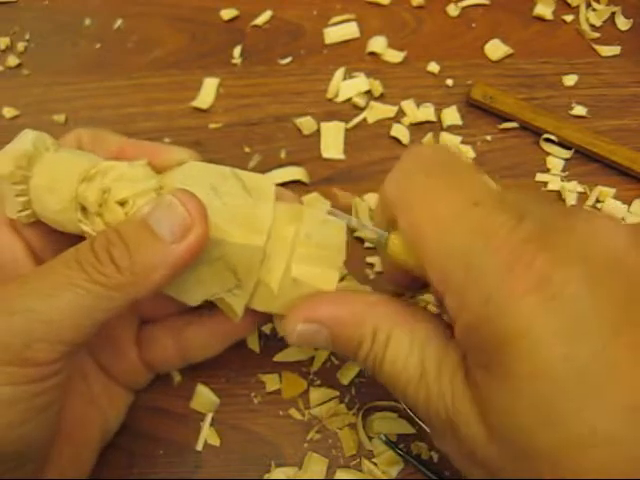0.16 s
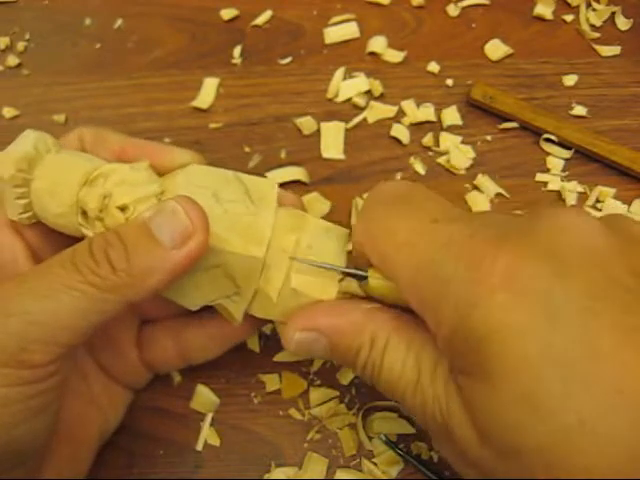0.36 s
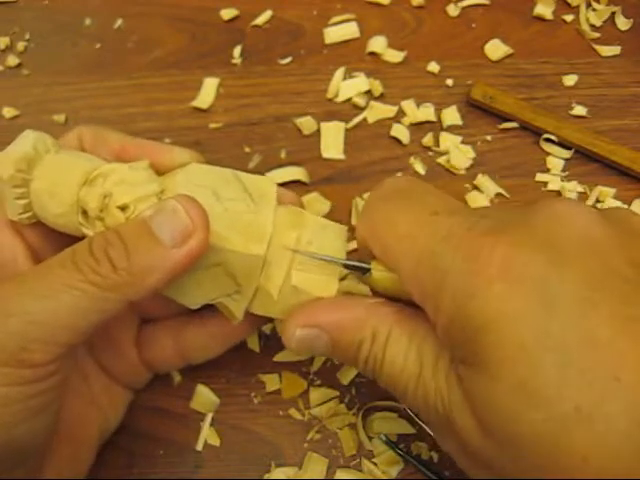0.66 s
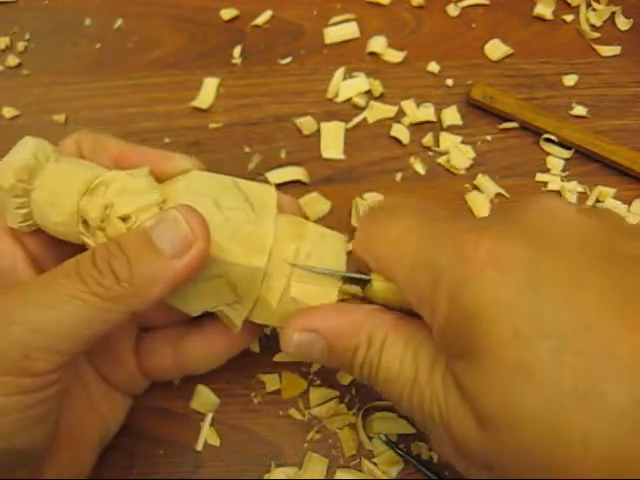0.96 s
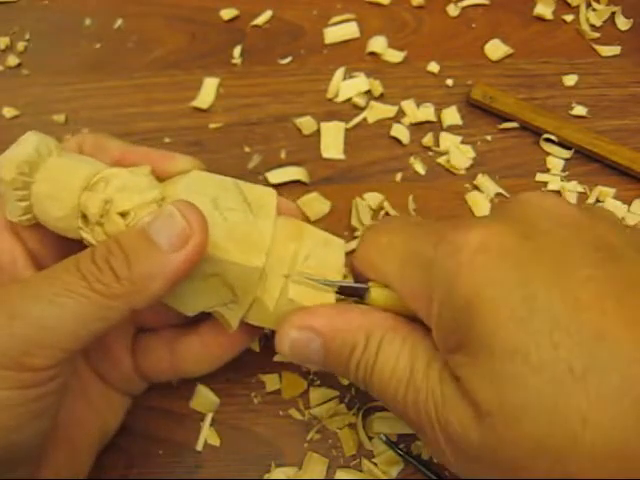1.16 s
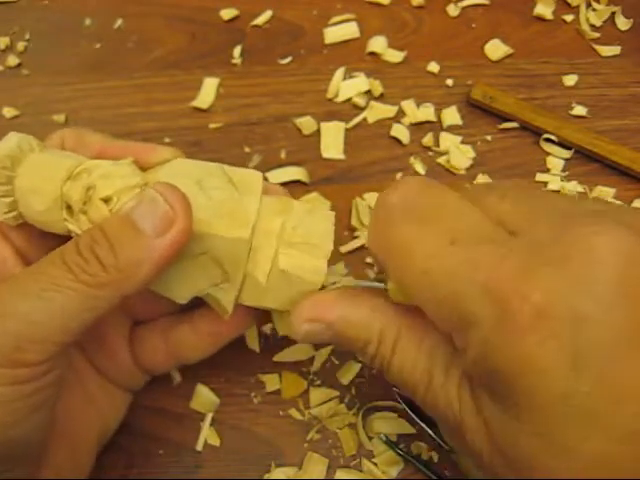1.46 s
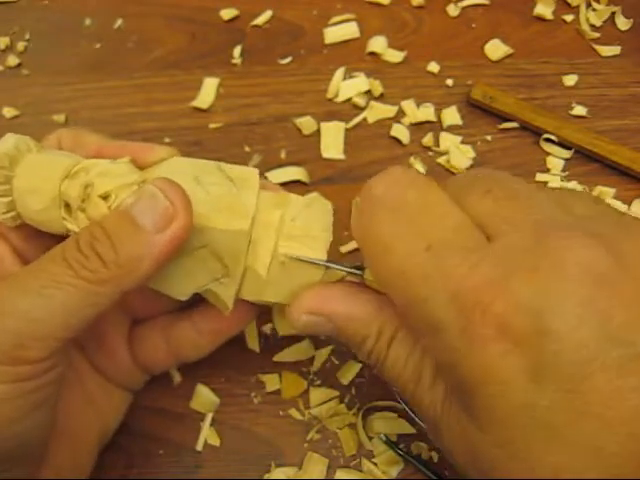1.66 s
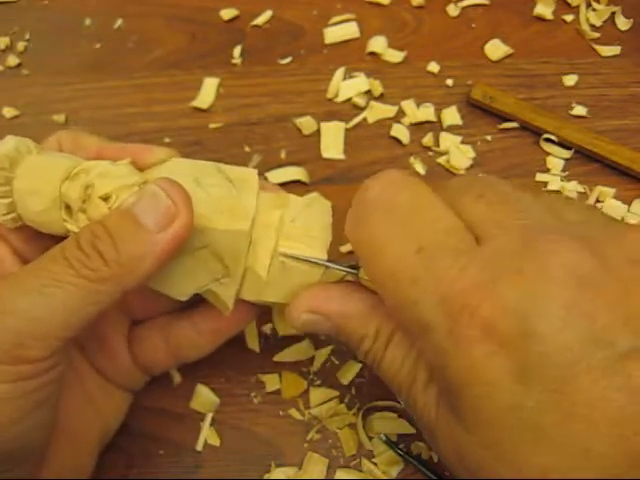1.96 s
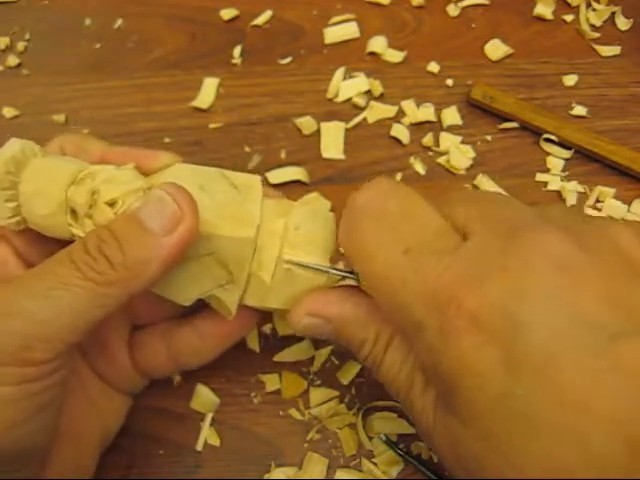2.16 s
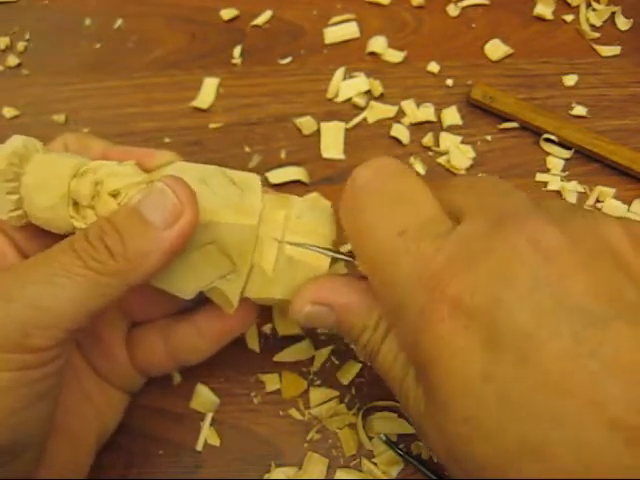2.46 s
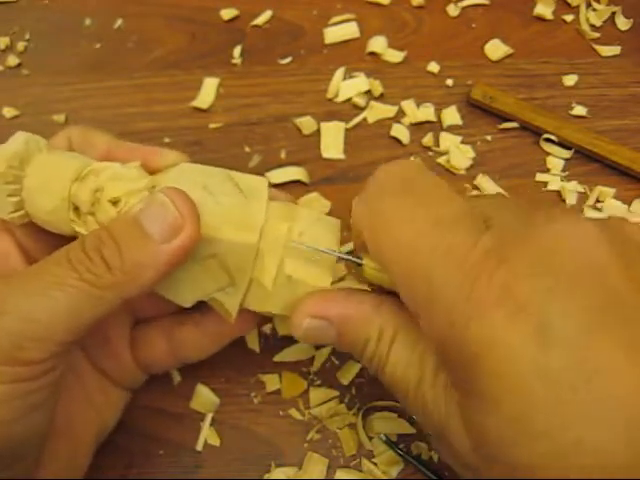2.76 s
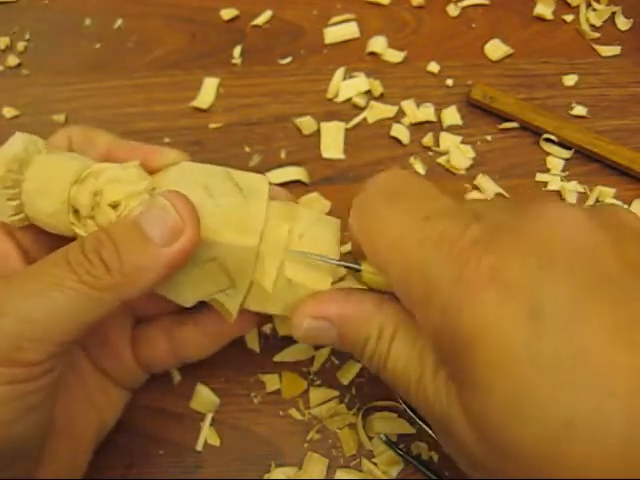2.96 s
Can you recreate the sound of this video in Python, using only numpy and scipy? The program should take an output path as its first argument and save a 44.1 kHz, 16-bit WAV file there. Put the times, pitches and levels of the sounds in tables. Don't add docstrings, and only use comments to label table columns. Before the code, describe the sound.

A small knife carves soft wood: faint cracks first, a loud snap with a table knock, a sharp click, then stuttering low creaks with squeaks and ticks; quiet humming room, close low-quality microphone.

```python
import sys
import numpy as np
from scipy import signal
from scipy.io import wavfile
from scipy.ndimage import uniform_filter1d

SR = 44100
rng = np.random.default_rng(int(sys.argv[2]) if len(sys.argv) > 2 else 0)


def gain_from_decibels(decibels):
    exponent = np.asarray(decibels, float) / 20
    return 10 ** exponent


def log_audio(samples):
    frames = np.atleast_2d(samples).T
    limited = np.clip(frames, -1, 1)
    pcm = np.round(limited * 32767).astype(np.int16)
    wavfile.write(sys.argv[1], SR, pcm)


N = 136710

# f/Hz, level/dB rms
HUM_LINES = [(58.8, -45), (119.5, -51), (352.5, -53), (411, -52)]
# f/Hz, width/Hz, level/dB rms
AIR_BANDS = [(110.24, 60, -53), (201.5, 64, -48), (289, 50, -47.5), (350.2, 45, -44.5), (410.8, 50, -49.5),
             (545.3, 200, -49), (820, 120, -50.5), (991.7, 180, -49.5), (1434, 500, -54.5),
             (2497, 3000, -56), (34.94, 30, -59)]
# f/Hz, level/dB, t60/s
TABLE_MODES = [(159.7, -14, 0.44), (264.5, -9.5, .2), (327.5, -3.5, 0.36), (333, -10.5, .2),
               (421, -6, 0.18), (515, -25, 0.038), (748, -7.5, 0.15), (887, -6, 0.032), (973, -5, .08),
               (1110, -18.5, 0.059)]
# t/s, level/dB
CREAK_SLIPS = [(1.865, -31), (1.893, -39), (1.922, -36.5), (1.975, -26), (1.996, -24), (2.018, -18.5),
               (2.043, -19.5), (2.069, -19.5), (2.095, -19.5), (2.121, -21), (2.145, -22.5), (2.172, -26),
               (2.201, -19.5), (2.227, -23), (2.254, -22), (2.283, -27.5), (2.313, -27.5), (2.345, -25),
               (2.379, -26), (2.413, -25.5), (2.45, -24), (2.485, -25.5), (2.523, -22), (2.563, -27),
               (2.597, -28.5), (2.719, -25.5)]
# t/s, level/dB, f/Hz
BLADE_SQUEAKS = [
    (1.975, -29, 1080),
    (1.988, -34, 1020),
    (1.9965, -31, 1830),
    (2.021, -34, 1800),
    (2.045, -30, 1970),
    (2.071, -39, 1950),
    (2.095, -39, 1940),
    (2.174, -39, 1850),
    (2.256, -42, 1900),
]
# t/s, rise/s, hold/s, fall/s, level/dB, f/Hz, width/Hz
EDGE_SCRAPES = [
    (.877, .001, .025, .02, -29, 2600, 5000),
    (.905, .022, .006, .004, -30, 4000, 4500),
    (.944, .002, .004, .035, -34, 3300, 5000),
    (.877, .001, .015, .02, -29, 600, 500),
    (1.194, .002, .01, .04, -34, 2900, 2500),
    (-.01, .005, .025, .025, -37, 3900, 3000),
    (2.085, .03, .09, .02, -41, 2600, 5000),
    (2.108, .032, .01, .007, -32, 3950, 1300),
    (2.164, .008, .008, .012, -39, 3700, 3000),
    (2.215, .015, .008, .008, -44, 3900, 3000),
]
# t/s, level/dB, f/Hz, width/Hz, crack length/s
BREAKS = [(.002, -28, 2700, 500, .012), (.009, -26, 3500, 700, .008), (.03, -28, 2650, 450, .02),
          (.786, -33, 4800, 2000, .001), (.8765, -14, 2600, 7000, .005), (.8782, -14, 1400, 3000, .005),
          (.9272, -17, 2100, 2500, .004), (.9312, -21, 3800, 3000, .003), (.9455, -17, 2400, 2000, .004),
          (1.1913, -12, 3850, 2000, .004), (1.193, -18, 4600, 2500, .005), (1.1925, -22, 2200, 1000, .004),
          (1.139, -38, 2200, 1500, .001), (1.355, -35, 4000, 3000, .001), (2.5068, -24, 2800, 2500, .003),
          (2.5098, -19, 3550, 800, .003), (2.5104, -20, 5300, 1200, .002), (2.5104, -21, 2400, 1000, .002),
          (2.5148, -21, 2600, 900, .002), (2.5215, -31, 2100, 700, .004), (2.568, -33, 5200, 1500, .001)]
# f/Hz, level/dB, t60/s
BLADE_MODES = [(1990, -5, .05), (2150, -8, .04), (2440, -7, .05), (2690, -4, .07), (2850, -8, .04),
               (3435, -3, .07), (3590, -5, .04), (4100, -5, .04), (4600, -3, .05), (4900, -6, .04)]
# t/s, depth/dB
GAIN_DUCKS = [
    (-.03, 7),
    (.95, 4.5),
    (1.195, 10),
    (2.521, 1.5),
]


def svf(x, hz, width_hz):
    return signal.lfilter(*signal.iirpeak(hz, hz / width_hz, SR), x)


def svf2(x, hz, width_hz):
    return svf(svf(x, hz, width_hz), hz, width_hz)


def unit(x):
    return x / np.sqrt(np.mean(x ** 2))


def walk(rate_hz):
    k = int(SR / rate_hz)
    held = np.repeat(rng.standard_normal(N // k + 1), k)
    return unit(uniform_filter1d(uniform_filter1d(held, k), k)[:N])


def ring(modes, u, signs):
    out = np.zeros(len(u))
    for (hz, db, t60_s), sign in zip(modes, signs):
        out += sign * gain_from_decibels(db - 60 * u / t60_s) * np.sin(2 * np.pi * hz * u)
    return out


def blade_ring(u):
    return ring(BLADE_MODES, u, (-1) ** np.arange(len(BLADE_MODES)))


def add(out, start_s, x):
    i = int(round(start_s * SR))
    out[i:i + len(x)] += x[:N - i]


def fan(t):
    out = np.zeros(N)
    for hz, db in HUM_LINES:
        out += np.sqrt(2) * gain_from_decibels(db + 1.2 * walk(6)) * np.sin(2 * np.pi * hz * t)
    flicker_db = .7
    for hz, width_hz, db in AIR_BANDS:
        air = svf2(rng.standard_normal(N), hz, 1.5 * width_hz)
        out += gain_from_decibels(db + flicker_db * walk(8)) * unit(air)
    return out


def table_knock():
    out, u = np.zeros(N), np.arange(SR // 2) / SR
    onset = 1 - np.exp(-u / 0.0013)
    add(out, .8765, gain_from_decibels(-17.5) * ring(TABLE_MODES, u, -np.ones(len(TABLE_MODES))) * onset)
    return out


def air_puff():
    out, u = np.zeros(N), np.arange(SR // 2) / SR
    length_s = .0025
    add(out, 1.1915, -gain_from_decibels(-25) * u / length_s * np.exp(1 - u / length_s))
    return out


def soft_thump(u, hz, rise_s, t60_s):
    envelope = np.minimum(u / rise_s, 1) ** 2 * gain_from_decibels(-60 * np.maximum(u - rise_s, 0) / t60_s)
    return envelope * np.cos(2 * np.pi * hz * (u - rise_s))


def creak():
    out, u = np.zeros(N), np.arange(SR // 10) / SR
    rise_s, t60_s, scatter = .005, .018, 0.057
    pitch = 1 + scatter * rng.standard_normal((len(CREAK_SLIPS), 2))
    for (start_s, db), (low, high) in zip(CREAK_SLIPS, pitch):
        thump = soft_thump(u, 247.2 * low, rise_s, t60_s)
        overtone = gain_from_decibels(-14) * soft_thump(u, 950 * high ** 2, rise_s, t60_s)
        add(out, start_s, gain_from_decibels(db) * (thump + overtone))
    return out


def squeaks():
    out, u = np.zeros(N), np.arange(SR // 10) / SR
    for start_s, db, hz in BLADE_SQUEAKS:
        rough = 1 + .3 * walk(600)[:len(u)]
        add(out, start_s, gain_from_decibels(db) * soft_thump(u, hz, .004, .028) * rough)
    return out


def scrapes(t):
    out = np.zeros(N)
    grains_per_s, grain_db, ring_db = 4500, 2.8, -7
    for start_s, rise_s, hold_s, fall_s, db, hz, width_hz in EDGE_SCRAPES:
        rise = np.clip((t - start_s) / rise_s, 0, 1) ** 2
        fall = np.exp(-np.maximum(t - start_s - rise_s - hold_s, 0) / fall_s)
        size = gain_from_decibels(grain_db * np.minimum(rng.exponential(size=N), 3))
        grains = (rng.random(N) < grains_per_s / SR) * rng.standard_normal(N) * size
        edge = unit(svf2(grains + .2 * rng.standard_normal(N), hz, 1.5 * width_hz))
        out += gain_from_decibels(db + 3.0 * walk(200)) * rise * fall * edge
    body = blade_ring(np.arange(SR // 8) / SR)
    body = body / np.sqrt(np.sum(body ** 2)) / 3
    return out + gain_from_decibels(ring_db) * signal.fftconvolve(out, body)[:N]


def ticks():
    out, u = np.zeros(N), np.arange(SR // 8) / SR
    body = blade_ring(u)
    splinter, ring_db = .09, -17
    for start_s, db, hz, width_hz, length_s in BREAKS:
        splinters = splinter * rng.standard_normal(len(u)) * np.exp(-u / length_s)
        crack = svf2(splinters - (u == 0), hz, width_hz)
        rung = signal.fftconvolve(crack, body)[:len(u)]
        crack_and_ring = crack / abs(crack).max() + gain_from_decibels(ring_db) * rung / abs(rung).max()
        add(out, max(start_s, 0), gain_from_decibels(db) * crack_and_ring)
    return out


def room(x):
    u = np.arange(SR // 2) / SR
    tail_db, t60_s = -14, .35
    tail = svf(svf(rng.standard_normal(len(u)), 2500, 3000), 2700, 4000) * gain_from_decibels(-60 * u / t60_s)
    return x + gain_from_decibels(tail_db) * signal.fftconvolve(x, unit(tail) / np.sqrt(len(u)))[:N]


def scene():
    t = np.arange(N) / SR
    cutting = room(ticks() + scrapes(t))
    return (cutting + squeaks() + creak() + air_puff() + table_knock() + fan(t))[None]


def roll_off(x):
    return signal.sosfilt(signal.butter(12, 16490, fs=SR, output="sos"), x)


def record(dry):
    t = np.arange(N) / SR
    attack_s, recover_db_per_s = 0.013, 16
    ducks_db = []
    for start_s, depth_db in GAIN_DUCKS:
        attack = np.clip((t - start_s) / attack_s, 0, 1)
        ducks_db.append(attack * np.maximum(depth_db - recover_db_per_s * (t - start_s), 0))
    x = dry * gain_from_decibels(-np.max(ducks_db, axis=0))
    x = signal.sosfiltfilt(signal.ellip(6, .2, 30, 5450, fs=SR, output="sos"), x)
    rate_hz, steps, offset = 11024, 128, -.0023
    held = (np.floor(t * rate_hz) * SR / rate_hz).astype(int)
    x = np.round((x[:, held] + offset) * steps) / steps
    x = signal.sosfiltfilt(signal.ellip(8, .1, 40, 15300, fs=SR, output="sos"), x)
    return roll_off(x)


dry = scene()
out = record(dry)
log_audio(out)
```